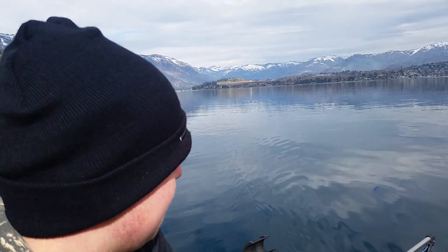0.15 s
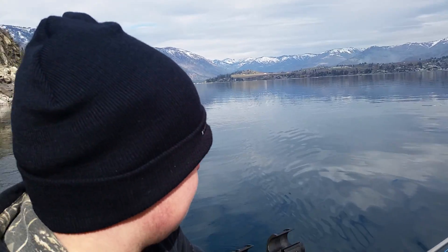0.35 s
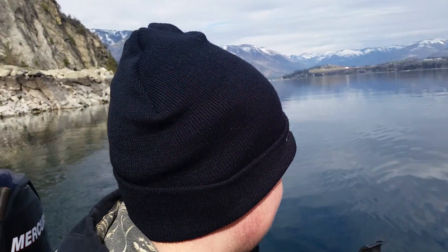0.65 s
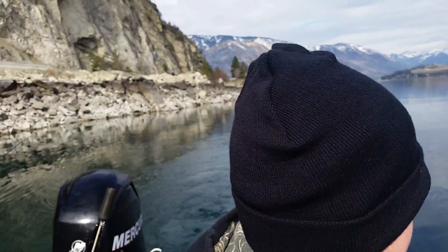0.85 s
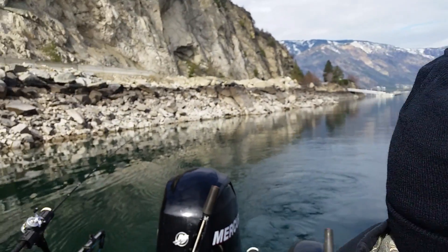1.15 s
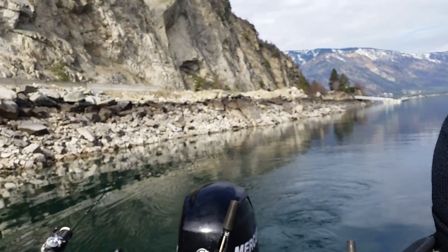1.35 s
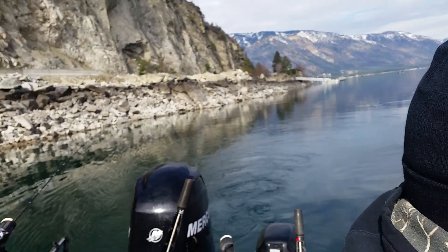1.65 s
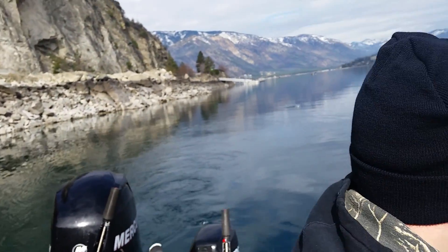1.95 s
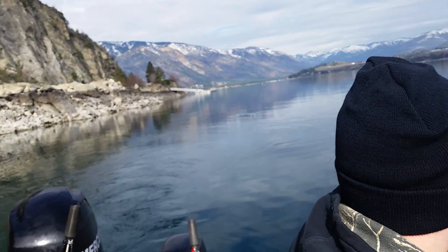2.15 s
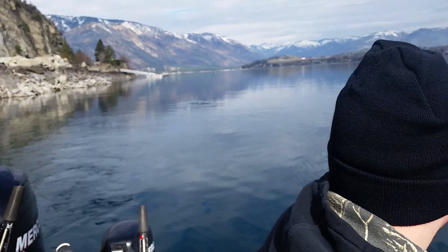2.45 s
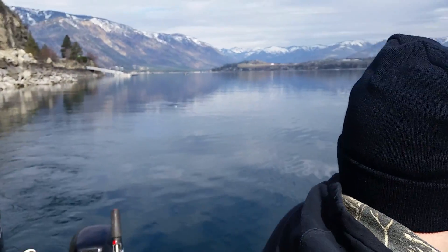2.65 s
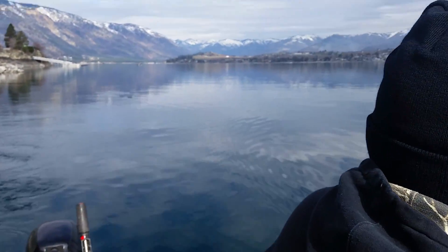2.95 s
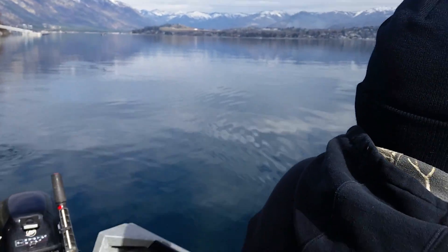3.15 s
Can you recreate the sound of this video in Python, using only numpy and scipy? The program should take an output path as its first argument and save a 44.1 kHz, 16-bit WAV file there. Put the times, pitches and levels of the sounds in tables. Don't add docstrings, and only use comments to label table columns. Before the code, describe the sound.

A boat's outboard engine putters throughout with a thin valve clatter. Fabric ticks and brushes near the left microphone, growing later, and soft hull bumps and small gear knocks cluster toward the end, outdoors, captured by phone.

```python
import sys
import numpy as np
from scipy import signal
from scipy.fft import rfft, irfft
from scipy.io import wavfile
from scipy.ndimage import uniform_filter1d

SR = 44100
rng = np.random.default_rng(int(sys.argv[2]) if len(sys.argv) > 2 else 0)


def volts(x):
    e = np.asarray(x, float) / 20
    return 10 ** e


def file_out(sig):
    cols = np.atleast_2d(sig).T
    lim = np.clip(cols, -1, 1)
    pcm = np.round(lim * 32767).astype(np.int16)
    wavfile.write(sys.argv[1], SR, pcm)


N = 145530

# (time [s], firing rate [Hz])
SPEED_HZ = [(0, 24.8), (0.14, 25.0), (0.45, 25.1), (0.66, 25.2), (0.84, 25.0), (1.0, 24.8), (1.39, 24.4),
            (1.58, 24.2), (2.17, 23.2), (2.49, 23.0), (2.87, 23.1), (2.97, 22.8), (3.17, 22.4), (3.3, 22.1)]
# (time [s], exhaust level [dB], clatter level [dB])
PHONE_SWING = [(0, -31, -53.5), (.15, -27.5, -53), (.45, -29.5, -52.5), (.72, -28, -53), (1.05, -30.5, -53),
               (1.2, -27.5, -53.5), (1.6, -29.5, -54.5), (1.95, -28, -51.5), (2.1, -30.5, -51.5),
               (2.2, -27, -53), (2.5, -26.5, -52), (2.62, -24, -50.5), (2.85, -25, -49), (3.1, -26, -50.5),
               (3.3, -30, -51)]
# (frequency [Hz], left-right correlation [0..1])
PORT_LIKENESS = [(60, .985), (300, .93), (430, .92), (600, .6), (1000, .8), (1400, .45), (2000, .1),
                 (16000, 0.05)]
# (frequency [Hz], left minus right [dB])
PORT_BALANCE = [(200, -3.5), (1000, 1), (1350, -3), (1900, 1.5), (2600, 8), (4700, 19), (9000, 13),
                (12500, 5.5)]
# (frequency [Hz], density [dB per Hz])
WATER_TONE = [(22, -37), (50, -22.5), (150, -19), (330, -18), (600, -33), (1000, -32.5), (1350, -37),
              (2000, -50)]
# (frequency [Hz], density [dB per Hz])
AIR_TONE = [(1180, -30.5), (2000, -5), (2310, -7), (2620, -3.5), (3870, -6.5), (4530, 0), (5440, -10.5),
            (6130, -11), (9000, -38), (11700, -64.5), (19800, -120)]
# (frequency [Hz], density [dB per Hz])
FABRIC_TONE = [(5290, -62.5), (9000, -33.5), (10200, -21), (11700, -8.5), (12500, -1.5), (14000, -4),
               (15100, -1), (16200, -13)]
# (frequency [Hz], density [dB per Hz])
RUB_TONE = [(9800, -31.5), (10800, -15.5), (11700, -3), (12500, 3.5), (13500, -3), (14500, -4.5),
            (15800, -9.5), (16200, -15)]
# (start [s], length [s], level [dB])
RUBS = [
    (0.72, .25, -57),
    (1.28, .35, -66),
    (2.0, .5, -63),
    (2.5, .5, -55.5),
    (2.85, .6, -56),
]
# (time [s], peak [dB], centre [Hz])
FABRIC_TICKS = [(0.0643, -52, 13800), (0.2274, -53, 13600), (0.2538, -43, 13900), (0.3062, -53, 14200),
                (0.3461, -40, 14900), (0.3825, -51, 14000), (0.394, -40, 15000), (0.5531, -51, 12800),
                (0.6734, -44, 13100), (1.0066, -44, 13600), (1.0645, -44, 12600), (1.1383, -47, 12600),
                (1.2106, -44, 15800), (1.2106, -26, 12400), (1.3428, -47, 14400), (1.3877, -45, 14200),
                (1.4147, -46, 14400), (1.4306, -41, 14200), (1.5404, -46, 14500), (1.7454, -45, 12900),
                (1.7913, -50, 12800), (1.8532, -47, 13300), (1.9225, -48, 11900), (2.0118, -50, 14400),
                (2.0537, -44, 12200), (2.1006, -41, 15700), (2.1904, -46, 12900), (2.3007, -42, 13600),
                (2.3201, -40, 12800), (2.4748, -46, 12900), (2.5182, -47, 13200), (2.5396, -43, 13300),
                (2.61, -37, 13400), (2.8409, -41, 15000), (2.9083, -40, 12200), (2.9547, -39, 13000),
                (3.035, -37, 12400), (3.1492, -32, 13000), (3.2171, -41, 12800), (3.262, -41, 12400)]
# (time [s], peak [dB], pitch [Hz])
BUCKLE_SNAPS = [
    (1.332, -66, 7500),
    (1.449, -62, 8600),
    (1.9934, -59, 7500),
    (2.625, -59, 8000),
    (2.7696, -54, 7400),
]
# (time [s], peak [dB], pitch [Hz])
HULL_BUMPS = [
    (1.588, -24, 78),
    (2.836, -17, 76),
]
# (time [s], peak [dB], pitch [Hz])
KNOCKS_AND_TAPS = [(2.768, -36, 700), (2.018, -40, 1800), (2.622, -38, 1400), (1.6695, -37, 1350),
                   (1.9645, -44, 2690), (2.1052, -44, 3830), (2.107, -45, 2200), (1.67, -47, 2650),
                   (2.7813, -36, 990), (2.9554, -36, 960), (2.795, -33, 1300), (2.882, -36, 1300),
                   (2.969, -32, 1250), (3.057, -34, 1300), (3.06, -45, 2000), (3.132, -37, 1070),
                   (3.222, -37, 1150), (3.236, -32, 1350), (3.238, -41, 1900)]
# (time [s], level [dB])
CLOSING_LEVEL = [(0, -60), (.95, -59.5), (1.1, -80), (3.3, -80)]
# (place in cycle [turns], level [dB])
VALVE_CONTACTS = [
    (.225, 0),
    (.385, -9),
    (.70, -1),
    (.83, -6),
]
# (time [s], extra [dB])
LAST_CONTACT = [(0, -3), (1.0, 0), (2.5, -1), (2.75, 2), (3.3, 4)]
# (frequency [Hz], width [Hz], left [dB], right [dB])
COWL_MODES = [(1058, 85, -6, -5), (1345, 55, -4, 3), (1560, 75, -12, -6), (2670, 80, -10, -20),
              (3820, 100, -15, -26), (424, 30, -6, -6), (1900, 250, -16, -12)]
# (time [s], extra [dB])
COWL_FACING = [(0, -5), (1.5, -4), (1.68, 4), (2.15, 3), (2.4, -3), (2.7, -3), (3.3, -2)]
# (time [s], extra [dB])
COWL_MAIN_RING = [(0, -2), (.85, -2), (1.05, 3.5), (1.45, 3), (1.7, 0), (2.5, 0), (2.8, -2), (3.3, -2)]
# (time [s], level [dB])
HULL_BOOM = [(0, -42), (.12, -34), (.3, -32), (.42, -33), (.55, -41), (.85, -43), (1.0, -36), (1.2, -34),
             (1.5, -33.5), (1.9, -36), (2.2, -39), (2.45, -48), (3.3, -46)]
# (frequency [Hz], width [Hz], level [dB])
EXHAUST_MODES = [(98.2, 7, -7), (124.5, 6.7, -3.5), (143.1, 7.1, -6), (190.25, 19.9, 8.5),
                 (213.2, 34.5, -3.5), (234.1, 19.8, 1.5), (283.2, 18, -17), (333, 36, -27), (415, 30, -24),
                 (504, 34, -21)]
# (time [s], extra [dB])
UPPER_EXHAUST = [(0, 3), (.4, 4), (1.0, 1.5), (1.5, 3), (2.0, -4.5), (2.4, 4), (2.8, -2.5), (3.3, -4.5)]

VALVE_JITTER_S, VALVE_SCATTER_DB = .0006, 1.9


def rms_one(x):
    return x / np.sqrt(np.mean(x ** 2) + 1e-20)


def in_time(rows):
    s, *columns = np.transpose(rows)
    return [np.interp(np.arange(N) / SR, s, c) for c in columns]


def at_hz(points, hz):
    table_hz, value = np.transpose(points)
    return np.interp(np.log(hz), np.log(table_hz), value)


def drift(rate_hz):
    r = np.exp(-80 * np.pi * rate_hz / SR)
    slow = signal.lfilter([1], [1, -2 * r, r * r], rng.standard_normal(N // 40 + 2002))[2000:]
    return np.interp(np.arange(N) / 40, np.arange(len(slow)), rms_one(slow))


def resonate(x, hz, width_hz):
    r = np.exp(-np.pi * width_hz / SR)
    zeros = np.array([1, 0, -1]) * (1 - r * r) / 2
    poles = [1, -2 * r * np.cos(2 * np.pi * hz / SR), r * r]
    return signal.lfilter(zeros, poles, x + 1e-18)


def clicks(s, gains):
    out = np.zeros(N + 1)
    np.add.at(out, np.clip((s * SR).astype(int), 0, N), gains * (s >= 0))
    return out[:N]


def fade(x, decay_s):
    return signal.lfilter([1], [1, -np.exp(-1 / (decay_s * SR))], x + 1e-18)


def cycle():
    return np.cumsum(in_time(SPEED_HZ)[0]) / SR / 2


def when(turns):
    return np.interp(turns, cycle(), np.arange(N) / SR, left=-1, right=2 * N / SR)


def hiss(spectrum, count, patchy_db, source=1):
    hz = np.maximum(np.arange(N // 2 + 1) * SR / N, 1)
    mid, side = rfft(rng.standard_normal((2, N)) * source)
    alike = np.clip(at_hz(PORT_LIKENESS, hz), 0, 1)
    pair = np.sqrt(1 + alike) * mid + np.sqrt(1 - alike) * side * [[1], [-1]]
    low_hz, high_hz = spectrum[0][0], spectrum[-1][0]
    tone_db = at_hz(spectrum, hz) + at_hz(PORT_BALANCE, hz) * [[0], [-1]]
    pair = pair * volts(tone_db) * (hz >= low_hz) * (hz < high_hz)
    place = np.log(hz / low_hz) / np.log(high_hz / low_hz) * (count - 1)
    out = 0
    for k in range(count):
        band = irfft(pair * np.clip(1 - abs(place - k), 0, 1), N)
        out = out + volts(patchy_db * drift(14.0)) * band
    return out / np.sqrt(np.mean(out.mean(axis=0) ** 2))


def water_and_air(swing_db):
    throb = np.cos(4 * np.pi * (cycle() - .26))
    water = volts(-36.5 + swing_db + 1.8 * throb) * hiss(WATER_TONE, count=10, patchy_db=0.0)
    air = volts(-59 + 0.7 * swing_db + 1.5 * throb) * hiss(AIR_TONE, count=6, patchy_db=1.0)
    return water + air


def fabric_hiss():
    crackles_per_s, crackle_db = 90, -11
    grains = (rng.random(N) < crackles_per_s / SR) * volts(3.9 * np.minimum(rng.exponential(1, N), 3))
    crackle = 1 + volts(crackle_db) * 4 * fade(grains, 0.00093)
    level_db = -69.5 + 4.5 * np.arange(N) / SR
    return volts(level_db) * hiss(FABRIC_TONE, count=4, patchy_db=-1.0, source=crackle) * volts([[0], [-6]])


def rubs():
    t = np.arange(N) / SR
    swell = 0
    for s, length_s, db in RUBS:
        swell = swell + volts(db) * np.sin(np.pi * np.clip((t - s) / length_s, 0, 1)) ** 1.2
    return swell * hiss(RUB_TONE, count=4, patchy_db=.6) * volts([[0], [-6]])


def right_port_hiss():
    return volts(-73) * rms_one(hiss(FABRIC_TONE, count=2, patchy_db=1.0)[0]) * [[0], [1]]


def fabric_ticks():
    edge_hz, decay_s, extra_db, size = 11200, .0007, 6.0, 600
    high = signal.butter(8, edge_hz, "high", fs=SR, output="sos")
    out = np.zeros((2, N))
    for s, db, hz in FABRIC_TICKS:
        burst = rng.standard_normal((2, size)) * np.exp(-np.arange(size) / SR / decay_s)
        burst = .4 * burst + 2 * resonate(burst, hz, 2500)
        burst = signal.sosfilt(high, signal.sosfilt(high, burst))
        burst = burst / abs(burst).max(axis=1, keepdims=True)
        i = int(s * SR) - 8
        out[:, i:i + size] += volts(db + extra_db) * burst * volts([[0], [-15]])
    return out


def snaps():
    out = 0
    for s, db, hz in BUCKLE_SNAPS:
        click = clicks(np.array([s]), volts(db + 31))
        out = out + resonate(resonate(click, hz, 800), hz, 1600)
    return out * volts([[0], [-16]])


def knocks():
    out = np.zeros(N)
    for table, turns in ((HULL_BUMPS, .8), (KNOCKS_AND_TAPS, 1.6)):
        for s, db, hz in table:
            t = np.maximum(np.arange(N) / SR - s, 0) * hz / turns
            envelope = np.e * t * np.exp(-t) * (t < 12)
            out += volts(db) * envelope * np.sin(2 * np.pi * turns * t - 2)
    return out


def valve_closings():
    hz, width_hz = 1600, 90
    turns = np.add.outer(np.arange(42), (.42, .76, .91)).ravel()
    chance = rng.standard_normal((len(turns), 2))
    taps = clicks(when(turns) + VALVE_JITTER_S * chance[:, 0], volts(VALVE_SCATTER_DB * chance[:, 1]))
    ring = resonate(resonate(taps, hz, width_hz), hz, 4 * width_hz)
    return volts(in_time(CLOSING_LEVEL)[0]) * rms_one(ring) * volts([[-3], [3]])


def valves():
    decay_s, rattle_gain, main_ring_hz = .004, .035, 1345
    turns, db = np.transpose([(c + turn, d) for c in range(42) for turn, d in VALVE_CONTACTS])
    chance = rng.standard_normal((len(db), 2 + len(COWL_MODES)))
    s = when(turns) + VALVE_JITTER_S * chance[:, 0]
    is_last = np.arange(len(db)) % len(VALVE_CONTACTS) == len(VALVE_CONTACTS) - 1
    db = db + np.interp(s, *np.transpose(LAST_CONTACT)) * is_last
    (facing_db,), (ringing_db,) = in_time(COWL_FACING), in_time(COWL_MAIN_RING)
    out = 0
    for j, (hz, width_hz, left_db, right_db) in enumerate(COWL_MODES):
        scatter_db = VALVE_SCATTER_DB * (chance[:, 1] + chance[:, 2 + j]) / np.sqrt(2)
        taps = clicks(s, volts(db + scatter_db))
        rattle = rattle_gain * rng.standard_normal((2, N)) * fade(taps, decay_s)
        pair = np.array([taps, np.roll(taps, j * j)]) + rattle
        pair = resonate(resonate(pair, hz, width_hz), hz, 4 * width_hz)
        turned_db = facing_db * (hz > 2000) + ringing_db * (hz == main_ring_hz) - 4
        out = out + rms_one(pair) * volts([[left_db], [right_db]]) * volts(turned_db)
    return out


def hum():
    turn = 2 * np.pi * cycle()
    boom_db = in_time(HULL_BOOM)[0] + 1.2 * drift(4)
    rock_db = -48.5 + 0.92 * drift(0.3)
    return np.sqrt(2) * (volts(boom_db) * np.cos(6 * turn + 0.5) + volts(rock_db) * np.cos(4 * turn + 0.26))


def exhaust():
    firing_turn, second_late_turn, jitter_s = .125, .012, .0002
    scatter_db, mode_scatter_db, wander_db = .8, 1.0, 1.5
    gas_db, gas_decay_s, even_s = -40, .03, .17
    k = np.arange(90)
    chance = rng.standard_normal((90, 2 + len(EXHAUST_MODES)))
    s = when(firing_turn - .5 + k / 2 + second_late_turn * (k % 2)) + jitter_s * chance[:, 0]
    db = scatter_db * chance[:, 1]
    gas = fade(clicks(s, volts(db)), gas_decay_s) * rng.standard_normal(N) * volts(gas_db)
    (upper_db,) = in_time(UPPER_EXHAUST)
    out = 0
    for j, (hz, width_hz, level_db) in enumerate(EXHAUST_MODES):
        pulses = clicks(s, volts(db + mode_scatter_db * chance[:, 2 + j])) + gas
        ring = resonate(resonate(pulses, hz, 1.5 * width_hz), hz, 1.5 * width_hz)
        mode_db = level_db + wander_db * drift(1.2) + upper_db * (205 < hz < 307.5)
        out = out + (-1) ** j * volts(mode_db) * rms_one(ring)
    return out / np.sqrt(uniform_filter1d(out ** 2, size=int(even_s * SR)) + 1e-9)


def scene():
    level_db, clatter_db = in_time(PHONE_SWING)
    centre = volts(level_db) * exhaust() + hum() + knocks()
    background = water_and_air(clatter_db - clatter_db.mean())
    clatter = volts(clatter_db) * valves()
    jacket = fabric_hiss() + rubs() + right_port_hiss() + fabric_ticks() + snaps()
    return centre * volts([[-.25], [.25]]) + background + clatter + jacket + valve_closings()


def roll_off(x):
    return signal.sosfilt(signal.butter(12, 16410, fs=SR, output="sos"), x)


def record(dry):
    lag_samples, cutoff_hz = 5, 16350
    late_right = np.r_[np.zeros(lag_samples), dry[1, :-lag_samples]]
    low_pass = signal.cheby2(12, 55, cutoff_hz, fs=SR, output="sos")
    mix = signal.sosfilt(low_pass, np.array([dry[0], late_right]))
    return roll_off(mix)


dry = scene()
out = record(dry)
file_out(out)
```